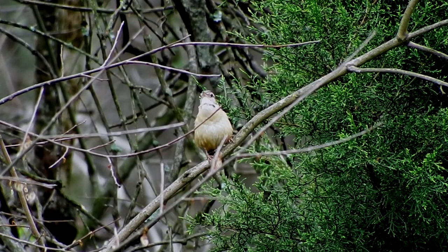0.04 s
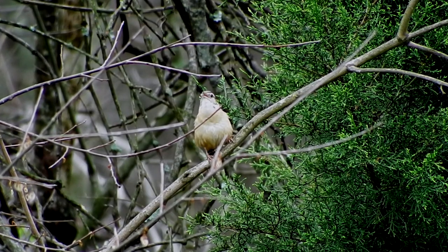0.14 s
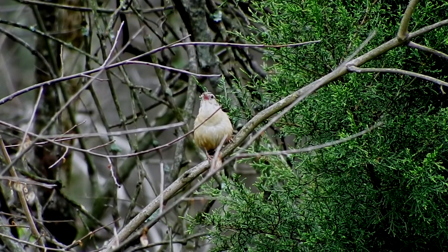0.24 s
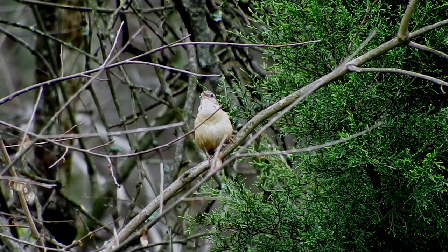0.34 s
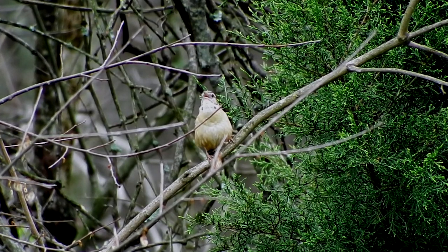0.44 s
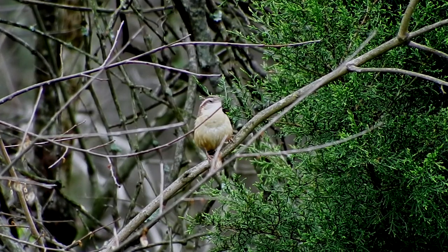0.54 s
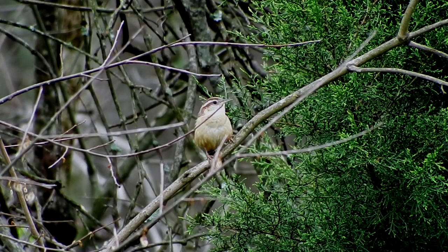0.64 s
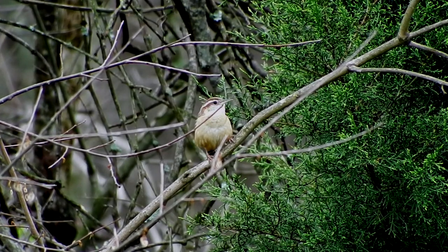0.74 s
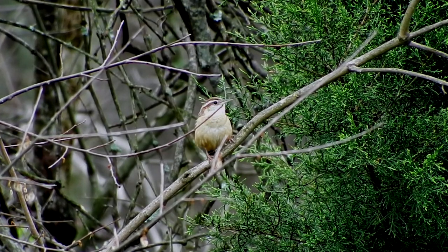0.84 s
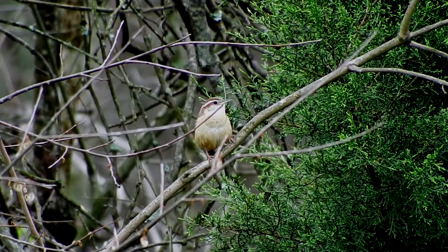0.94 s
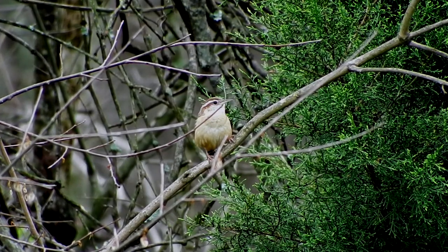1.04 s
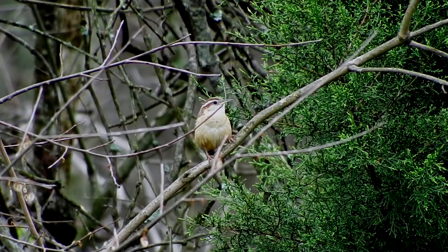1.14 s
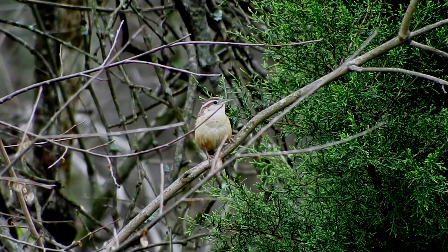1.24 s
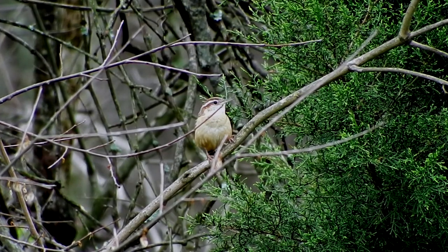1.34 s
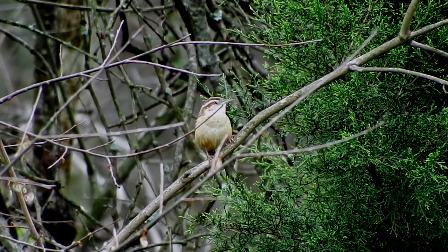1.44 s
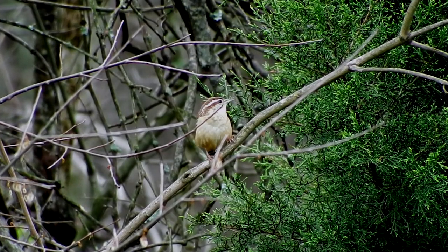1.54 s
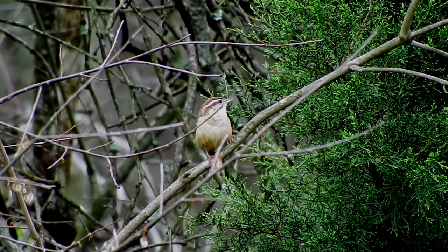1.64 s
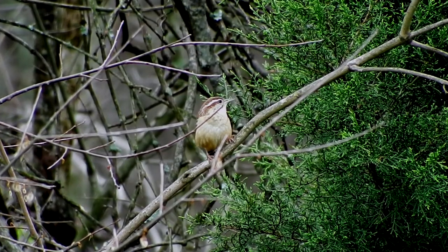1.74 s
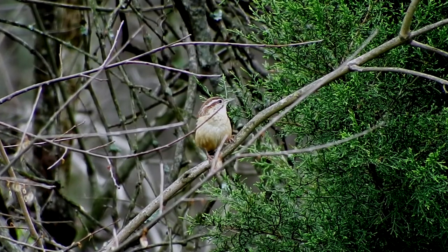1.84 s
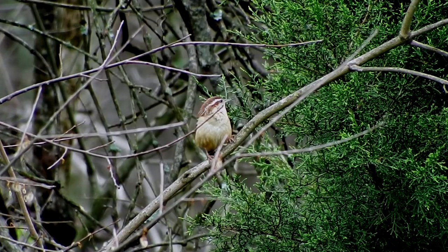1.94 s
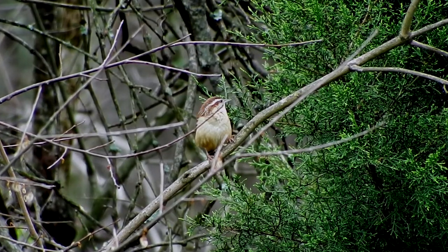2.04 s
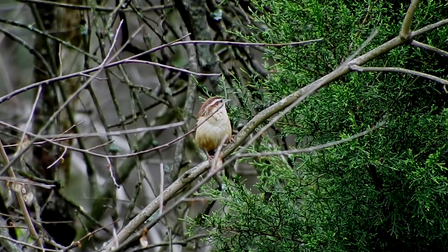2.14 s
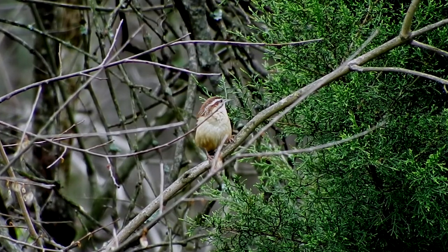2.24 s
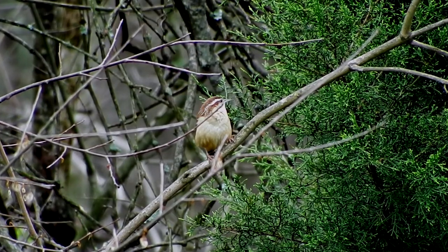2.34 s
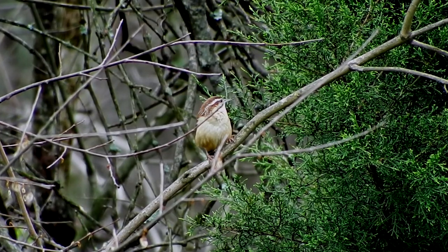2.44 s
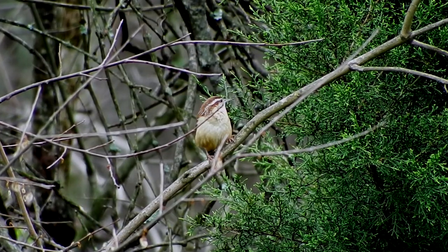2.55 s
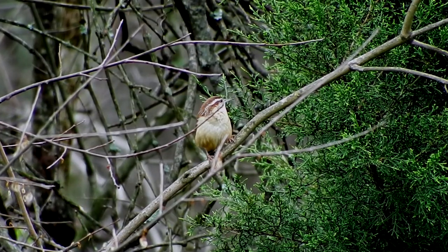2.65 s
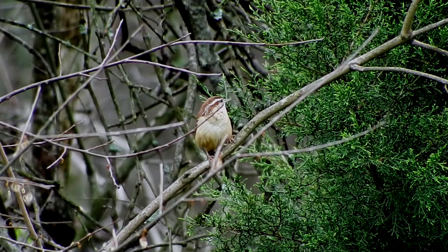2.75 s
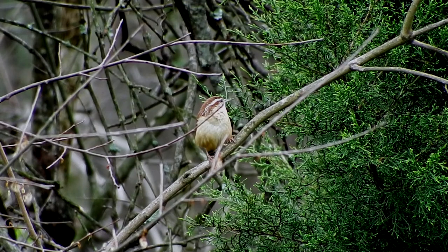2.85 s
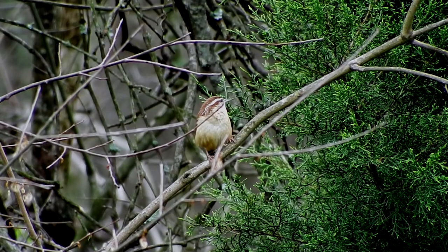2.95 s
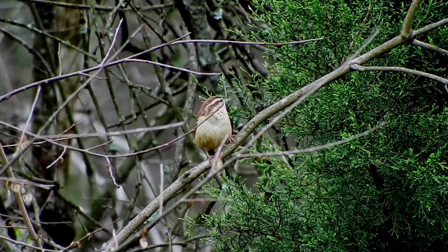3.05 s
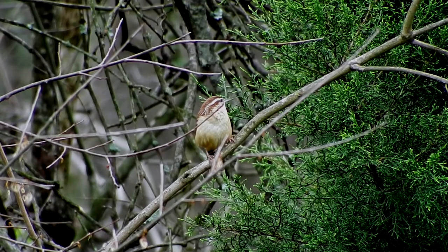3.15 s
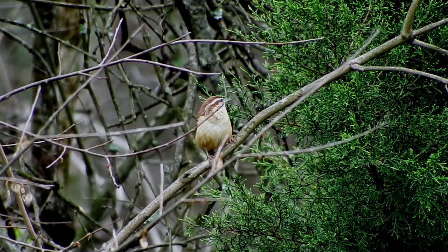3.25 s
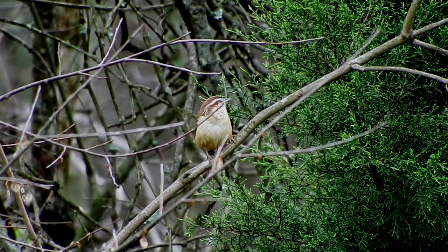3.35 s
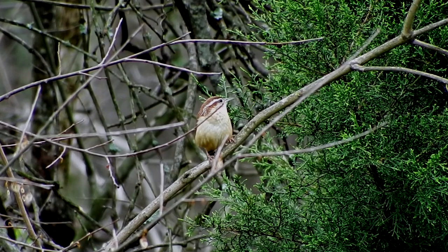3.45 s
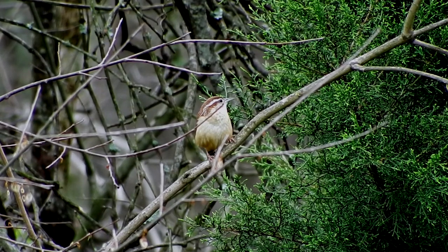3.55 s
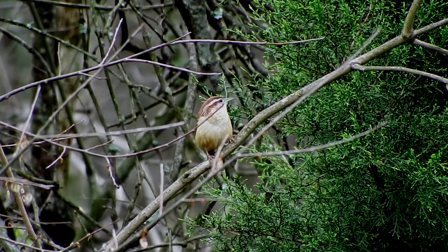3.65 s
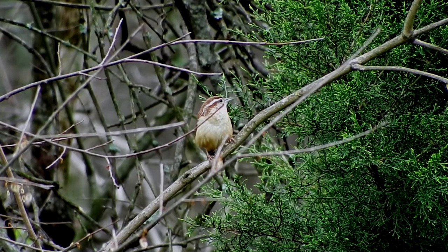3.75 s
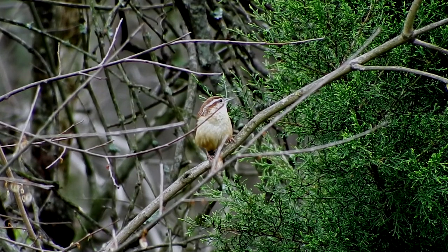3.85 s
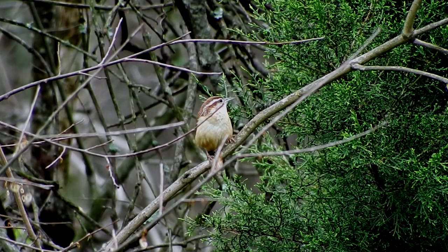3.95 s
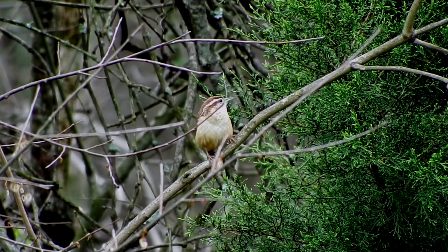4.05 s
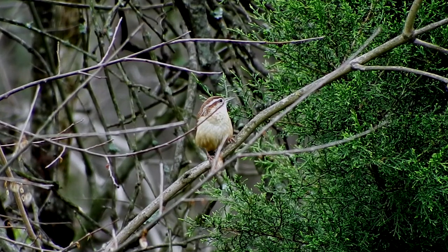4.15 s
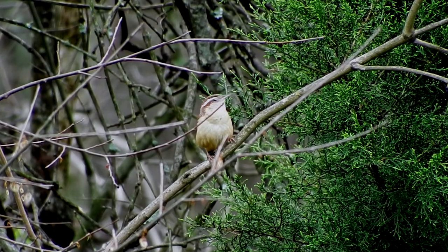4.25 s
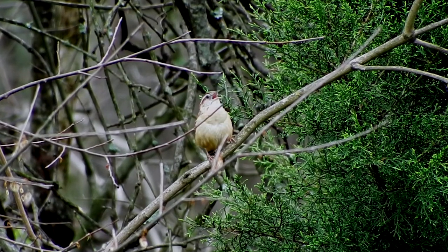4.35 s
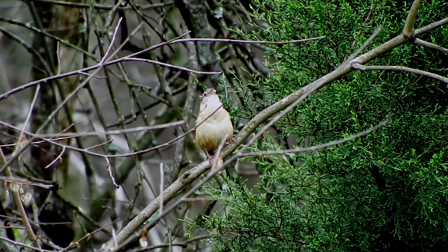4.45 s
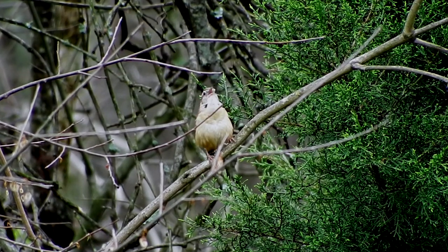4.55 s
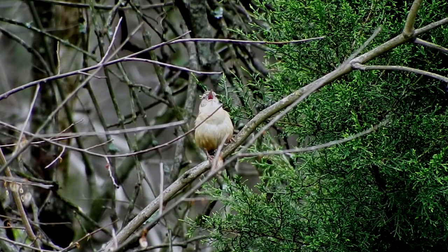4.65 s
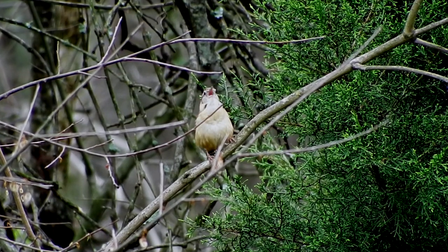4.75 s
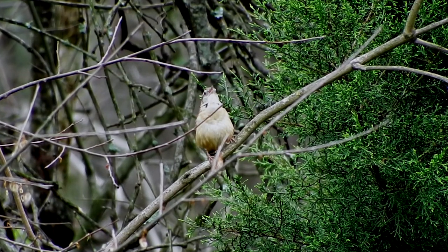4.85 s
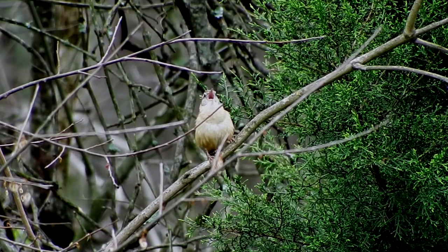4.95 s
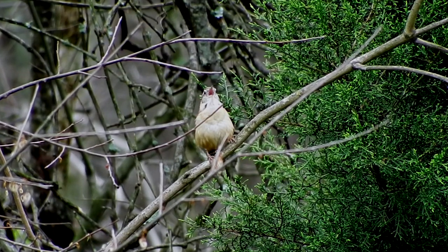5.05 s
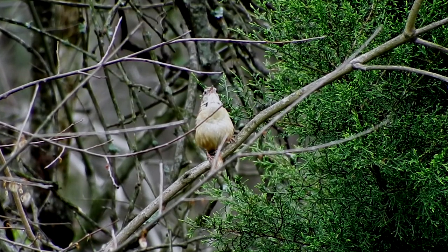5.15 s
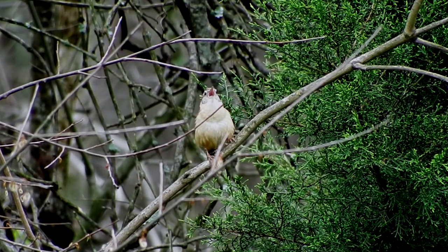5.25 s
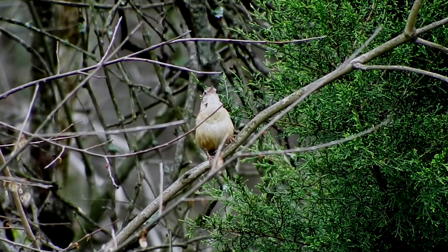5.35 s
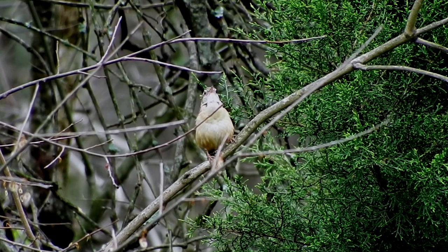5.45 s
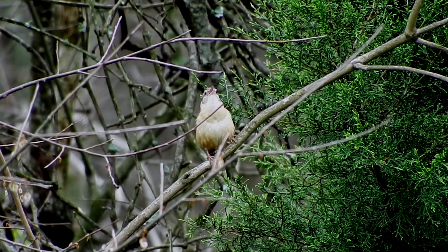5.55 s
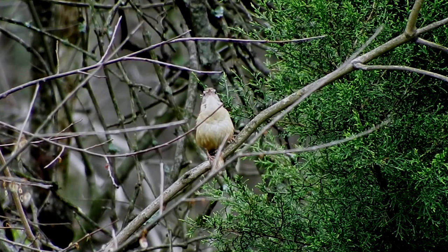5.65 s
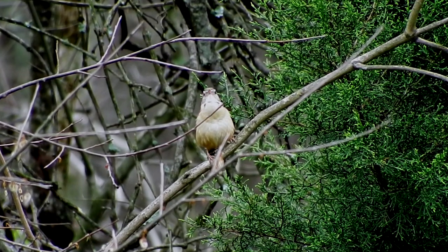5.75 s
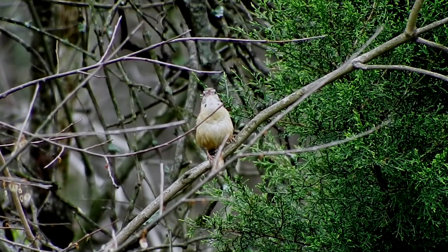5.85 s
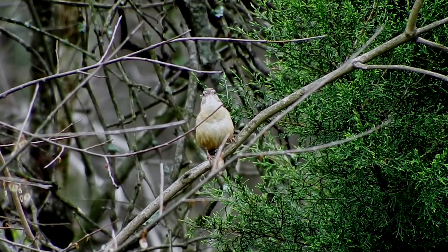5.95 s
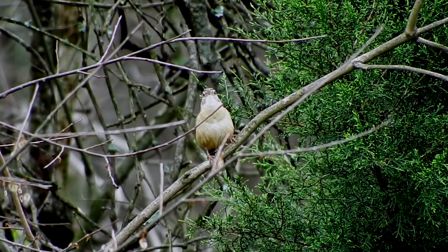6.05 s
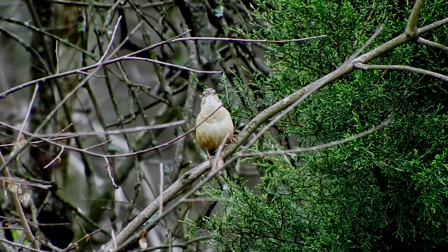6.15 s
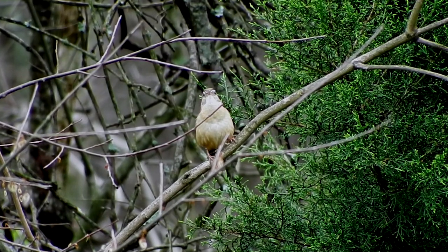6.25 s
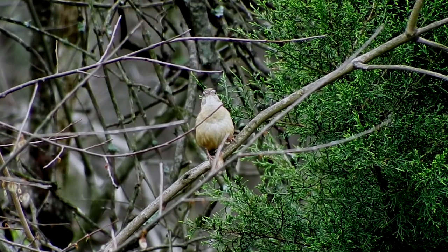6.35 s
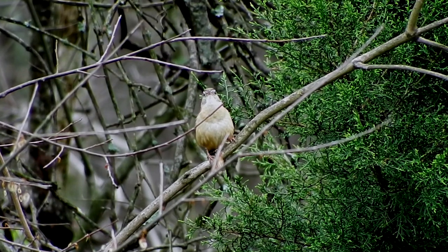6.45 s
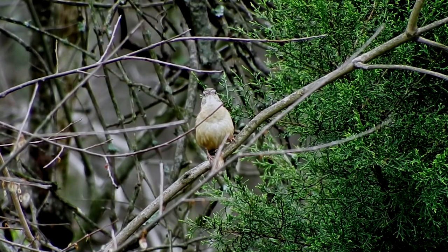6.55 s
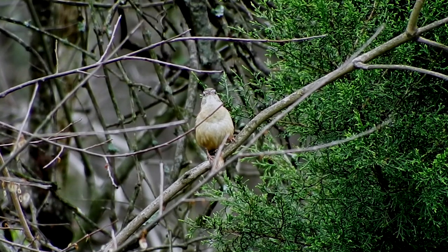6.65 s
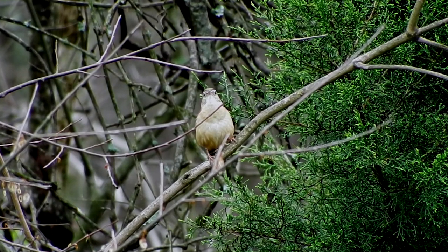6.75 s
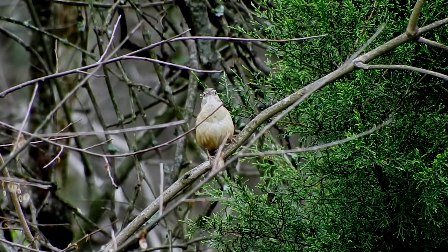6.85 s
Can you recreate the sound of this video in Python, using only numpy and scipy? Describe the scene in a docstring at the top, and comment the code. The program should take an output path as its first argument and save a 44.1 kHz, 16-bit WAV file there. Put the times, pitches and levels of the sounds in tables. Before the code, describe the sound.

Loud, repeated rolling wren phrases alternate with other birds' falling whistles, a ripple and a rattling trill over faint woodland hiss.

```python
"""First comes a wren, whistling a rolling figure of short sliding notes over and over in a wood.
Neighbours answer with falling whistles, a quick ripple and a rattling trill. Behind them are faint
chirps from far birds, one low breathy hoot and the soft hiss of distant air and leaves.
Each bird note is a wavering sine tone that glides in pitch, and the hiss is shaped noise.
The ground, trunks and leaves throw the whistled notes back as echoes."""
import sys
import numpy as np
from scipy import signal
from scipy.io import wavfile
from scipy.ndimage import uniform_filter1d

SR = 44100
rng = np.random.default_rng(int(sys.argv[2]) if len(sys.argv) > 2 else 0)


def bounce(signal):
    """Save signal as a 16-bit WAV file at the path given by the first command-line argument."""
    frames = np.transpose(np.atleast_2d(signal))
    limited = np.clip(frames, -1, 1)
    pcm = np.round(limited * 32767).astype(np.int16)
    wavfile.write(sys.argv[1], SR, pcm)


N = 304290

# Tone colour of the hiss: (frequency [Hz], relative level [dB])
HISS_SPECTRUM = [(59, -54.5), (100, -35), (162, -13), (211, -16.5), (266, -2), (430, 0.5), (939, -5.5),
                 (1100, -13), (1200, -10.5), (1910, -12.5), (3090, -13.5), (3820, -16.5), (4910, -35.5),
                 (7000, -49), (9100, -68.5), (15400, -120)]
# How the hiss swells and sinks: (time [s], relative level [dB])
HISS_LOUDNESS = [(0.0, -67), (0.77, -67), (1.46, -74), (1.75, -72), (1.9, -68.5), (2.32, -67),
                 (3.09, -71.5), (3.34, -69), (3.54, -65.5), (4.02, -66.5), (4.57, -66.5), (4.73, -65.5),
                 (5.17, -66.5), (5.9, -66), (6.17, -67.5), (6.9, -67)]
# How alike the hiss is in both ears: (frequency [Hz], likeness [0-1])
HISS_LIKENESS = [(100, .93), (300, .99), (700, .98), (2000, .99), (5000, 0.3)]
# Echo of near trunks: (frequency [Hz], time to fade by 60 dB [s], relative level [dB])
WOOD_ECHO = [(300, 0.4, -9.5), (1900, 0.3, -3.5), (2960, 0.29, 1.5), (4420, 0.31, 5), (6500, 0.17, 1.5)]
# Far birds: (time [s], length [s], start pitch [Hz], end pitch [Hz], level [dB],
# left minus right [dB], rasp [fraction of amplitude])
FAR_CHIRPS = [(.831, .026, 5030, 3570, -61, -2.8, .35), (.948, .025, 4700, 3600, -69, .3, 1.2),
              (.982, .045, 2680, 2450, -66, 0, .35), (.985, .03, 4900, 3460, -63, .3, .35),
              (1.125, .04, 3950, 3850, -68, .3, 1.2), (1.231, .024, 2950, 3130, -57.5, 1.1, .35),
              (1.235, .05, 3620, 3830, -71.5, -1.1, .35), (1.262, .06, 4660, 4640, -78, 3, .1),
              (1.471, .037, 4140, 3750, -57, 6, .35), (1.512, .021, 2900, 2800, -63.5, 2.1, .35),
              (1.527, .023, 3750, 3100, -55.5, -1.1, .35), (1.581, .048, 2620, 2420, -60.5, 0, .35),
              (1.935, .025, 4100, 3600, -67, .3, 1.2), (2.03, .025, 4100, 3700, -65, .3, 1.2),
              (2.325, .04, 3850, 3700, -64, .3, 1.2), (2.412, .046, 3960, 3300, -57, -1.2, .8),
              (2.66, .07, 2500, 1910, -67, -1.5, .35), (2.7, .052, 4000, 3560, -61, 1.5, .35),
              (2.791, .031, 4400, 3060, -61.5, 2.1, .35), (2.81, .051, 2430, 2010, -63, 2.1, .35),
              (2.843, .043, 2300, 2980, -60, 1.2, .35), (3.016, .026, 3780, 3620, -53.5, .6, .35),
              (3.042, .02, 3620, 3650, -49.5, -1.5, .35), (3.046, .031, 2370, 3060, -62, -.6, .35),
              (3.132, .045, 2740, 2040, -66.5, -.6, .35), (3.172, .018, 4550, 3640, -68.5, -1.5, .35),
              (3.181, .055, 3700, 3600, -61.5, 0, .35), (3.227, .023, 2560, 2220, -67.5, -5, .35),
              (3.23, .048, 2560, 3050, -59.5, .7, .35), (3.532, .05, 2400, 2050, -62, -3, .35),
              (4.004, .08, 2700, 2710, -58, -3.5, .35), (4.094, .13, 2030, 1560, -54.5, 0, .35),
              (4.282, .055, 2250, 1770, -51, -.6, .35), (4.477, .026, 3700, 3550, -52, .3, 1.2),
              (5.075, .022, 6350, 7150, -69, 5, .35), (6.149, .018, 6460, 7100, -76, -8, .35),
              (6.5, .006, 5100, 4600, -71, -3, .35), (6.512, .048, 4050, 3780, -71.5, 10.5, .35)]

# Slides, which a singer may shift in time, pitch and level: (time [s], length [s],
# start pitch [Hz], middle pitch [Hz], end pitch [Hz], level [dB], place of the loudest point [0-1])
HOOT_PUFFS = [(3.33, .03, 409, 408, 386, -48, .38), (3.386, .062, 352, 344, 332, -34.5, .2),
              (3.455, .035, 420, 420, 394, -54, .6)]
RIPPLE_INTRO = [(3.277, .034, 3590, 3480, 3450, -25.5, .72), (3.278, .018, 3000, 3190, 3380, -35, .45)]
RIPPLE_NOTE = (3.309, .027, 2680, 3080, 3330, -29.5, .58)
TRILL_INTRO = [(3.63, .036, 7450, 7200, 6400, -57, .75), (3.663, .021, 6450, 6140, 6050, -41.5, .6)]
TRILL_HELD_NOTE = (.043, .057, 5150, 5670, 5540, -47, .15)
TRILL_SWEEP = (.005, .018, 5400, 3780, 3120, -29.5, .52)
WHISTLE_AFTER_NOTE = (.168, .042, 2440, 2490, 2525, -38, .75)

# Bursts of the trill: (time [s], level change [dB], extra change for the first sweep [dB])
TRILL_BURSTS = [(3.6776, 2.7, -4), (3.7702, 2.2, -7), (3.8651, 4, -5), (3.9593, 2.2, -7),
                (4.054, 1.1, -5.5), (4.1508, -4.5, -12)]
# Falling whistles: (time [s], level change [dB], pitch [factor], time stretch [factor])
WHISTLE_CALLS = [(1.683, -2.3, .98, .93), (1.978, -2.9, .98, .96), (2.286, -2.2, .985, .96),
                 (6.329, -3.2, 1.02, 1.001), (6.622, -.8, 1.001, .97)]
# The wren's arched opening note: (time in the figure [s], pitch [Hz], level [dB])
WREN_OPENING = [(.005, 3700, -59), (.011, 4500, -47), (.017, 5650, -57), (.023, 6520, -64),
                (.034, 6950, -64), (.048, 6600, -69), (.062, 5050, -52), (.072, 4590, -34.5),
                (.081, 4450, -44)]
# The short slides that make up its other notes, some joining into one note:
# (the seven slide columns, hold [exponent], bend [exponent]); see slide()
WREN_SLIDES = [(.075, .014, 3214, 2880, 2700, -27, .62, 1.5, .9),
               (.087, .02, 2700, 2390, 2270, -25.5, .22, 1.4, .9),
               (.115, .019, 2870, 2865, 3020, -21.5, .62, 1.6, 1.2),
               (.130, .017, 2950, 3330, 3500, -20.5, .36, 2.3, 1.1),
               (.184, .045, 1945, 2000, 2240, -25.5, .66, 1.4, 1.05),
               (.237, .012, 2945, 2600, 2420, -29, .6, 1.8, .95),
               (.241, .034, 2400, 2485, 2750, -24, .55, 2.8, 1.02),
               (.301, .013, 2580, 2500, 2520, -34.5, .48, 1.3, 1.1)]
# Repeats of the figure: (time [s], slides' level change [dB], their time stretch [factor],
# opening's level change [dB], extra change for its start [dB], pitch of its end [factor])
WREN_REPEATS = [(-.254, -0.3, 1.001, 5.5, 8.5, 0.98), (0.0693, 0.56, 1.003, -2, 11.5, 0.97),
                (0.3955, -1, 1.016, -0.3, 4.3, 0.93), (4.5113, -1.5, .992, -2.8, -30.5, 1),
                (4.8292, 1.4, 1, 2.1, 1.5, 0.99), (5.1485, 2, 1.002, 3.5, 3, .99),
                (5.4684, 0.84, 0.99, 2.4, 3, 1.008), (5.7889, 0.15, 0.99, -3.3, 4.5, .97)]

HEAD_START = SR // 2  # samples before time zero, so that earlier notes still ring


def gain_of(db):
    """Turns decibels into a number to multiply a sound by."""
    return 10 ** (np.asarray(db) / 20)


def unit_level(x):
    """Scales a signal so that its average strength (rms) is 1."""
    return x / np.sqrt(np.mean(x ** 2) + 1e-20)


def curve_at(points, hz):
    """Looks up a frequency table, blending between rows on a log-frequency axis."""
    table_hz, value = np.transpose(points)
    return np.interp(np.log(hz + 1), np.log(table_hz + 1), value)


def swell(progress, peak, edge_db, hold):
    """A note's level in dB rises from edge_db to 0 and falls back; a higher hold flattens the top."""
    peak = np.clip(peak, .05, .95)
    return edge_db * abs((progress - peak) / np.where(progress < peak, peak, 1 - peak)) ** hold


def slide(row, edge_db, hold, bend=1.01):
    """Points (time [s], pitch [Hz], level [dB]) of one slide; a lower bend hurries the start."""
    start, length, from_hz, mid_hz, to_hz, db, peak = row
    progress = np.linspace(0, 1, num=15)
    arch = np.polyfit([0, .5, 1], [from_hz, mid_hz, to_hz], 2)
    hz = np.polyval(arch, progress ** bend)
    return np.transpose([start + progress * length, hz, db + swell(progress, peak, edge_db, hold)])


def sing(mix, start, points, db=0, pitch=1, overtones_db=(), flutter=.0061, rasp=.039):
    """Adds one gliding sine tone to mix; flutter shakes its pitch and rasp shakes its loudness."""
    times, pitches, levels_db = np.transpose(points)
    t = np.arange(times[0], times[-1], 1 / SR)
    slow, quick = rng.standard_normal((2, SR // 4))
    waver = 1 + flutter * unit_level(uniform_filter1d(slow, size=150))[:len(t)]
    hz = pitch * waver * uniform_filter1d(np.interp(t, times, pitches), size=120)
    phase = 2 * np.pi * (np.cumsum(hz) / SR + rng.random())
    tone = np.sin(phase) + sum(gain_of(d) * np.sin(k * phase) for k, d in enumerate(overtones_db, 2))
    tone *= 1 + rasp * unit_level(uniform_filter1d(uniform_filter1d(quick, size=45), size=45))[:len(t)]
    level = gain_of(db + uniform_filter1d(np.interp(t, times, levels_db), size=80))
    soft_ends = signal.windows.tukey(len(t), min(250 / len(t), .5))
    slot = mix[HEAD_START + round((start + times[0]) * SR):][:len(t)]
    slot += (np.sqrt(2) * level * tone * soft_ends)[:len(slot)]


def wood(sound, echo_db, alike=.99, build_s=.015, ground_s=.0022, ground_db=-13):
    """Adds echoes: one ground bounce, clumps from near trunks and a weak, long one from deeper in."""
    size = HEAD_START
    echoes = np.zeros((2, size))
    arrivals = np.arange(100, size - 20, 20) + rng.integers(0, 20, (2, (size - 101) // 20))
    np.put_along_axis(echoes, arrivals, rng.choice([-1., 1.], arrivals.shape), 1)
    echoes *= 1 - np.exp(-np.arange(size) / SR / build_s)
    clumps_db = 3 * unit_level(uniform_filter1d(rng.standard_normal(size), size=300))
    hz, t, spectra = signal.stft(echoes * gain_of(clumps_db), SR, nperseg=256)
    band_hz, fade_s, band_db = np.transpose(WOOD_ECHO)
    near = gain_of(-60 * (t / np.interp(hz, band_hz, fade_s)[:, None]) ** 1.3)  # holds, then dies fast
    deep = gain_of(-28 - 60 * t)  # loses 60 dB a second
    fade = gain_of(np.interp(hz, band_hz, band_db))[:, None] * (near + deep)
    shared, apart = signal.istft(spectra * fade, SR, nperseg=256)[1]
    apart = np.sqrt(1 - alike ** 2) * apart  # the part that differs between the ears
    ears = np.array([alike * shared + apart, alike * shared - apart])
    response = gain_of(echo_db) * ears / np.linalg.norm(shared)
    response[:, round(ground_s * SR)] += gain_of(ground_db)
    response[:, 0] = 1  # the direct sound
    return signal.oaconvolve(sound * np.ones((2, 1)), response, axes=1)[:, HEAD_START:HEAD_START + N]


def hiss():
    """Distant air and leaves: soft noise with drifting louder and quieter patches."""
    frames, hz = N // 256 + 5, np.fft.rfftfreq(1024, 1 / SR)
    left_re, left_im, other_re, other_im, patches = rng.standard_normal((frames, 513, 5)).T
    patches = unit_level(uniform_filter1d(uniform_filter1d(patches, size=14, axis=0), size=16, axis=1))
    alike = curve_at(HISS_LIKENESS, hz)[:, None]
    left = left_re + 1j * left_im
    right = alike * left + np.sqrt(1 - alike ** 2) * (other_re + 1j * other_im)
    patchy_db = np.clip(.8 + .48 * hz / 1000, 0, 3)[:, None]  # far chatter makes the treble patchier
    colour = gain_of(curve_at(HISS_SPECTRUM, hz)[:, None] + patchy_db * patches)
    noise = signal.istft(np.array([left, right]) * colour, nperseg=1024, noverlap=768)[1][:, :N]
    level_db = 5 + np.interp(np.arange(N) / SR, *np.transpose(HISS_LOUDNESS))
    return gain_of(level_db) * unit_level(noise)


def chatter(count=14):
    """Makes rows like FAR_CHIRPS for the faintest chirps: randomly timed and mostly falling."""
    when, length, height, glide, loudness, side = rng.random((count, 6)).T
    from_hz = np.interp(height, [0, 1], [2200, 4600])
    to_hz = from_hz * (1.05 - .2 * glide)
    return np.transpose([when * (N / SR - .1), np.interp(length, [0, 1], [.02, .07]), from_hz, to_hz,
                         -82 + 5 * loudness, 12 * (side - .5), np.full(count, .35)])


def far_birds(chirps):
    """Far birds give short glides that swell and fade, each from its own side."""
    out = np.zeros((2, HEAD_START + N))
    for start, length, from_hz, to_hz, db, side_db, rasp in chirps:
        chirp = np.zeros(HEAD_START + SR // 4)
        note = (0, length, from_hz, (from_hz + to_hz) / 2, to_hz, db, .5)
        sing(chirp, 0, slide(note, edge_db=-10, hold=2), flutter=.007, rasp=rasp)
        slot = out[:, HEAD_START + round(start * SR):][:, :SR // 4]
        slot += (chirp[HEAD_START:] * gain_of([[side_db / 2], [-side_db / 2]]))[:, :slot.shape[1]]
    return out


def hoot():
    """A low hoot in three puffs: a wavering tone with breathy noise that follows its loudness."""
    tone = np.zeros(HEAD_START + N)
    for note in HOOT_PUFFS:
        sing(tone, 0, slide(note, edge_db=-22, hold=1.7), overtones_db=(-28, -32), flutter=.03, rasp=.2)
    tone = tone[HEAD_START:]
    breath_band = signal.butter(4, [550, 1500], "band", fs=SR, output="sos")
    breath = unit_level(signal.sosfilt(breath_band, rng.standard_normal(N)))
    loudness = np.sqrt(abs(uniform_filter1d(tone ** 2, size=400)))
    return tone + gain_of(-23.5) * breath * loudness


def rippling_bird(count=7, step_s=.0303):
    """A neighbour sings a two-voiced note, then quick rising notes, each lower and softer."""
    out = np.zeros(HEAD_START + N)
    for voice in RIPPLE_INTRO:
        sing(out, 0, slide(voice, edge_db=-16, hold=1.6))
    for k in range(count):
        sing(out, k * step_s, slide(RIPPLE_NOTE, edge_db=-17, hold=1.6), db=-.9 * k, pitch=1 - .012 * k)
    return out


def trilling_bird(step_s=.012):
    """A neighbour sings one high falling note, then six bursts of three down-sweeps and a held note."""
    out = np.zeros(HEAD_START + N)
    sweep = slide(TRILL_SWEEP, edge_db=-16, hold=1.6, bend=.85)
    held = slide(TRILL_HELD_NOTE, edge_db=-12, hold=1.5, bend=.45)
    for part in TRILL_INTRO:
        sing(out, 0, slide(part, edge_db=-16, hold=1.7))
    for start, db, first_db in TRILL_BURSTS:
        for k in range(3):
            sing(out, start + k * step_s, sweep, db + (first_db if k == 0 else 0), rasp=.12)
        sing(out, start, held, db, flutter=.002, rasp=.05)
    return out


def whistling_bird(base_length_s=.162, base_hz=3235, sag_hz_per_s=1400):
    """A neighbour's whistle scoops in from above, sags, then drops and weakens; a low note follows."""
    out = np.zeros(HEAD_START + N)
    t = np.linspace(0, base_length_s, num=30)
    scoop_hz = 190 * np.exp(-t / .012)
    drop = 1 / (1 + np.exp((.128 - t) / .009))  # a smooth step from 0 to 1 near the end
    hz = base_hz - sag_hz_per_s * t + scoop_hz - 700 * drop
    level_db = -29 - 10.5 * drop + swell(t / base_length_s, peak=.5, edge_db=-18, hold=3.6)
    fall = np.transpose([t, hz, level_db])
    for start, db, pitch, stretch in WHISTLE_CALLS:
        for points in fall, slide(WHISTLE_AFTER_NOTE, edge_db=-14, hold=1.8):
            sing(out, start, points * [stretch, 1, 1], db, pitch, flutter=.003, rasp=.0067)
    return out


def wren():
    """The wren repeats one figure; its high, slightly hoarse opening note varies most."""
    out = np.zeros(HEAD_START + N)
    for start, db, stretch, opening_db, rise_db, end_pitch in WREN_REPEATS:
        opening = np.array(WREN_OPENING)
        opening[:3, 2] += rise_db
        opening[-2:, 1] *= end_pitch
        sing(out, start, opening, opening_db, overtones_db=(-48,), flutter=.006, rasp=.2)
        for *row, hold, bend in WREN_SLIDES:
            pitch = 1 + .004 * rng.standard_normal()  # no two slides are alike
            points = slide(row, edge_db=-21, hold=hold, bend=bend)
            sing(out, start, points * [stretch, 1, 1], db, pitch)
    return out


def scene():
    """Gives each bird its echo and its left and right level, then adds the background."""
    trill = wood(trilling_bird(), echo_db=-12, alike=1) * gain_of([[.45], [-.45]])
    trill[1] = np.roll(trill[1], shift=1)  # reaches the right side one sample late
    song = wood(wren(), echo_db=-8.5) * gain_of([[.1], [-.1]])
    whistles = wood(whistling_bird(), echo_db=-6.5) * gain_of([[-.75], [.75]])
    ripple = wood(rippling_bird(), echo_db=-9.5) * gain_of([[.7], [-.7]])
    far = wood(far_birds(FAR_CHIRPS) + far_birds(chatter()), echo_db=-8, alike=.85)
    return song + whistles + trill + ripple + far + hoot() + hiss()


def record(dry, rumble_hz=160, notch_hz=1100, top_hz=13500):
    """Cuts the rumble and one narrow band, adds faint electronic hiss, then cuts the highest treble."""
    no_rumble = signal.sosfilt(signal.butter(2, rumble_hz, "high", fs=SR, output="sos"), dry)
    notched = signal.lfilter(*signal.iirnotch(notch_hz, Q=14, fs=SR), no_rumble)
    both, left, right = rng.standard_normal((3, N))
    electronic_hiss = gain_of(-89.5) * (both + .5 * np.array([left, right]))
    treble_cut = signal.firwin(511, top_hz, window=("kaiser", 9), fs=SR)
    return signal.oaconvolve(notched + electronic_hiss, treble_cut[None], "same")


dry = scene()
out = record(dry)
bounce(out)
```